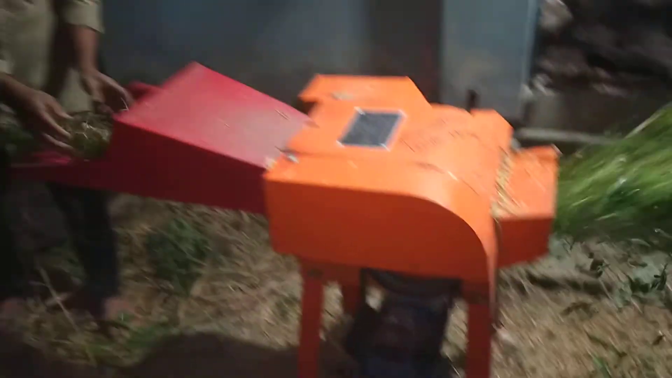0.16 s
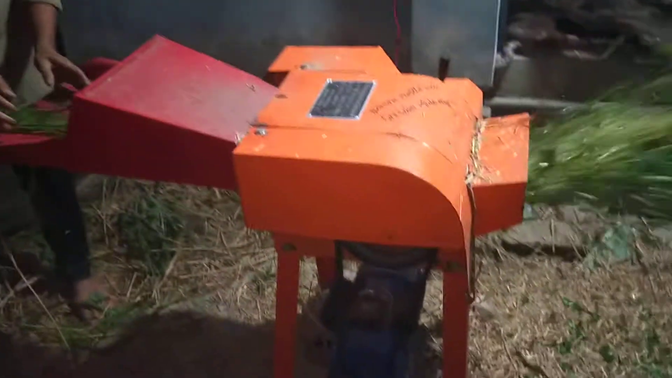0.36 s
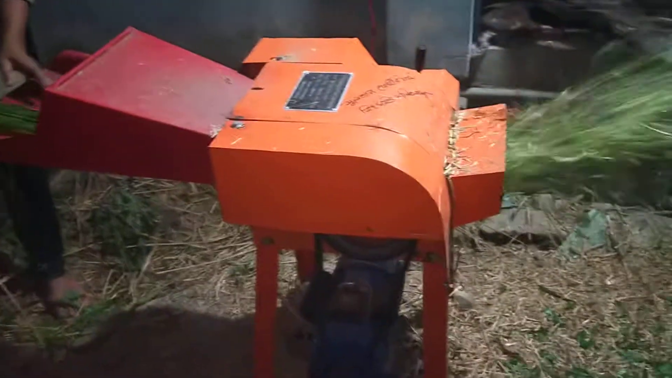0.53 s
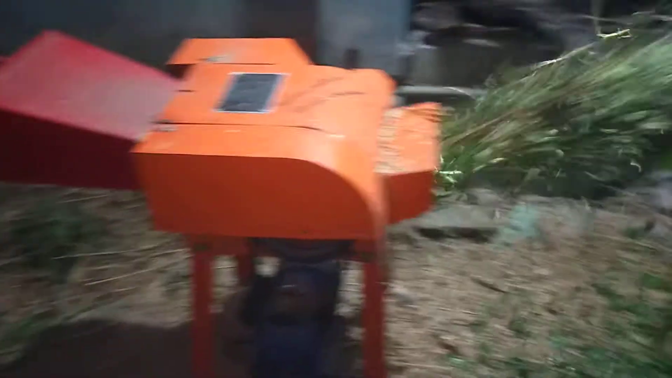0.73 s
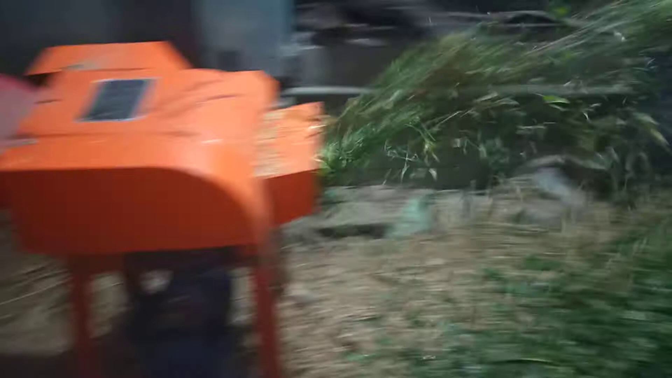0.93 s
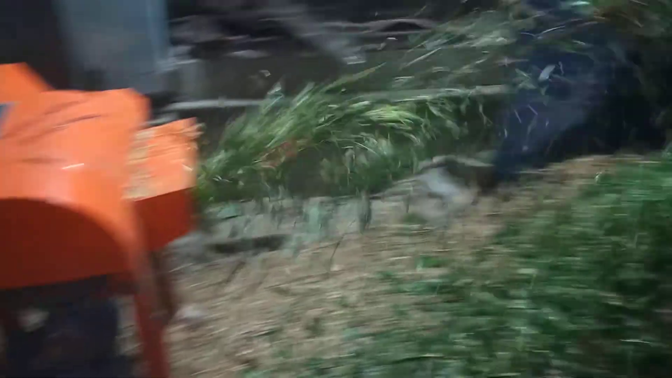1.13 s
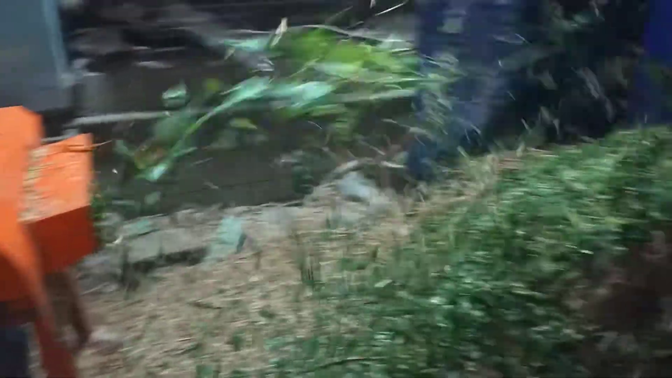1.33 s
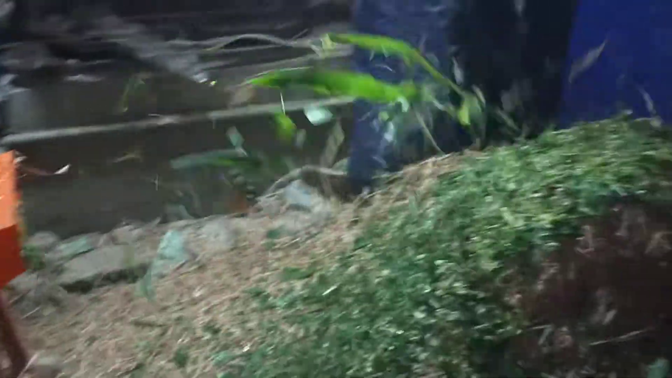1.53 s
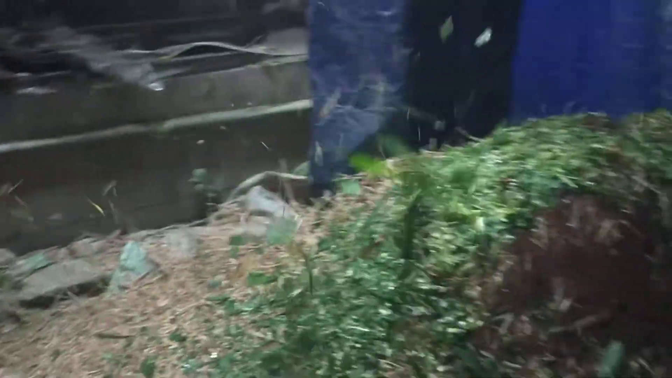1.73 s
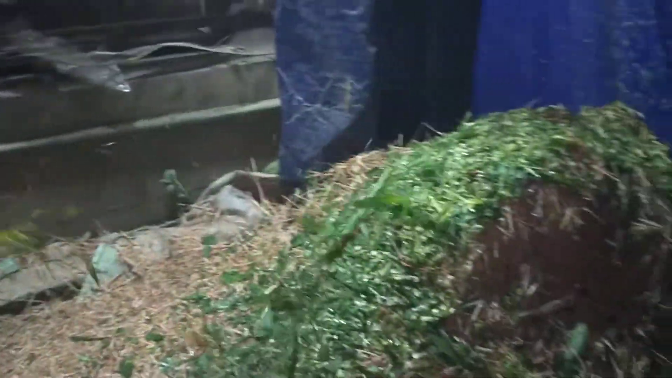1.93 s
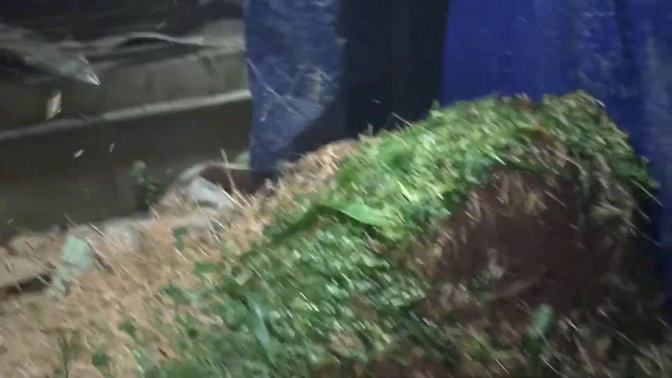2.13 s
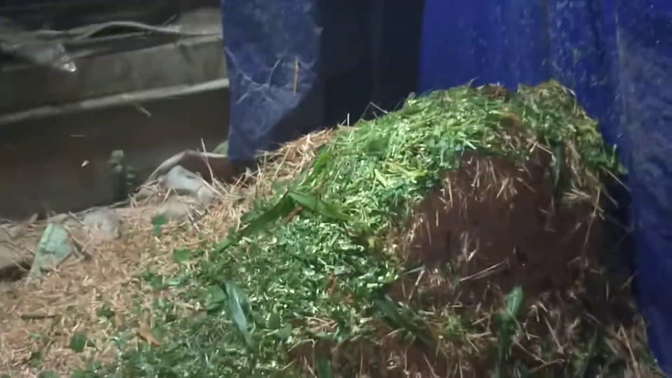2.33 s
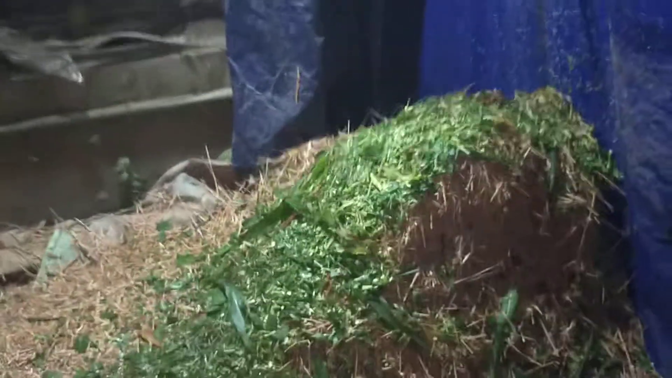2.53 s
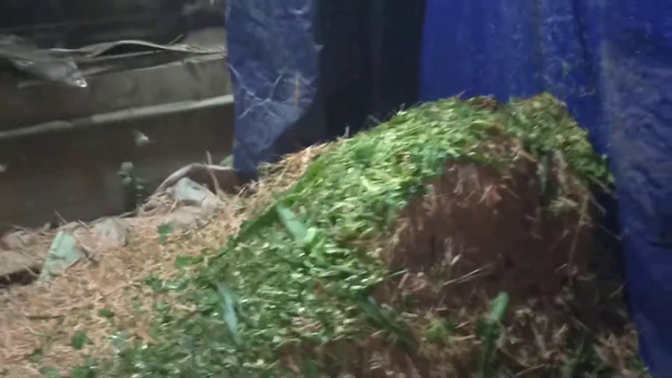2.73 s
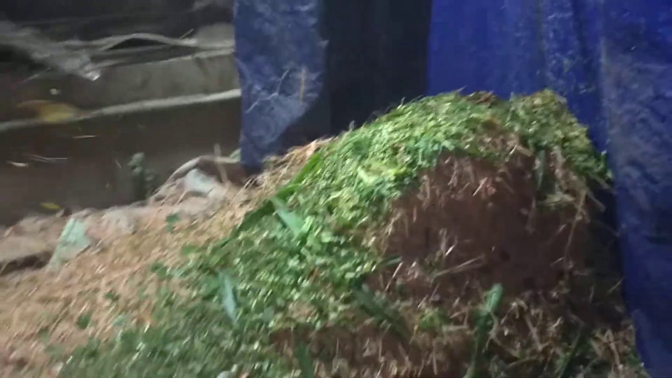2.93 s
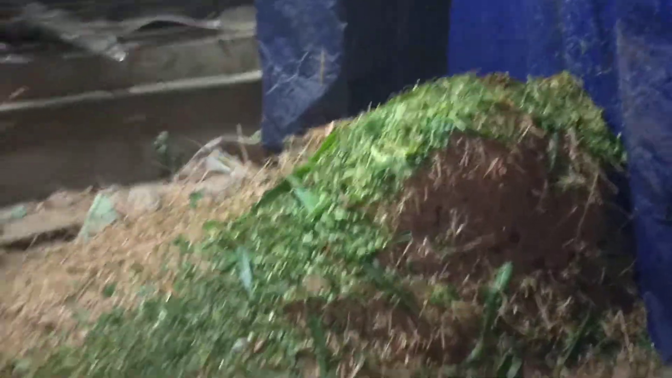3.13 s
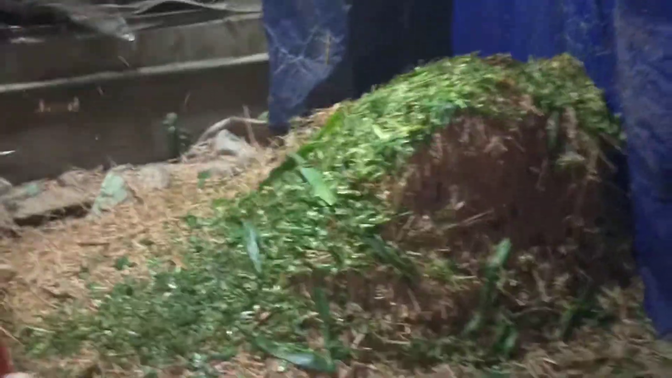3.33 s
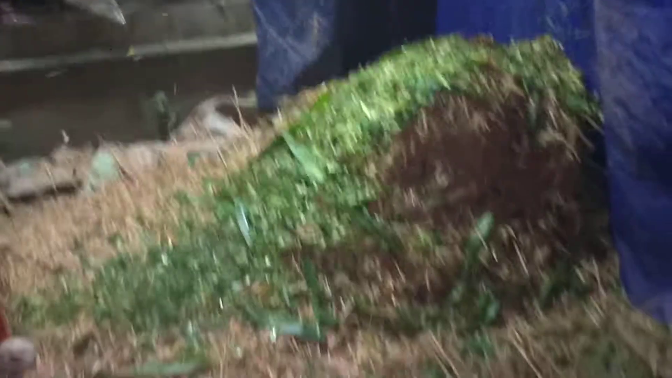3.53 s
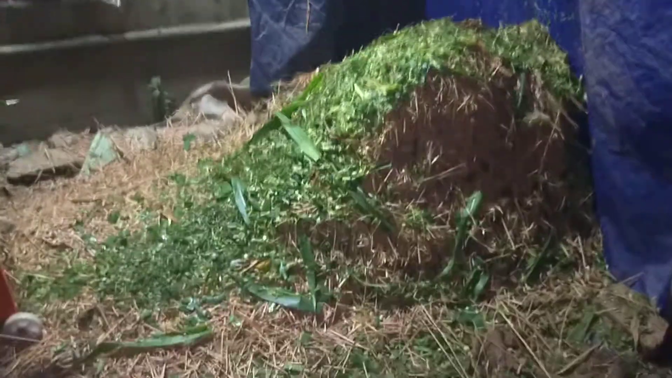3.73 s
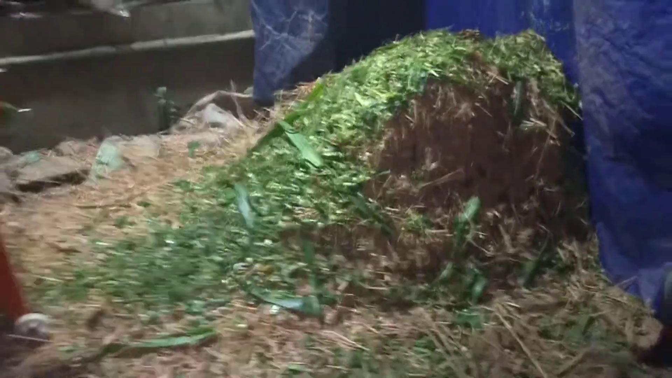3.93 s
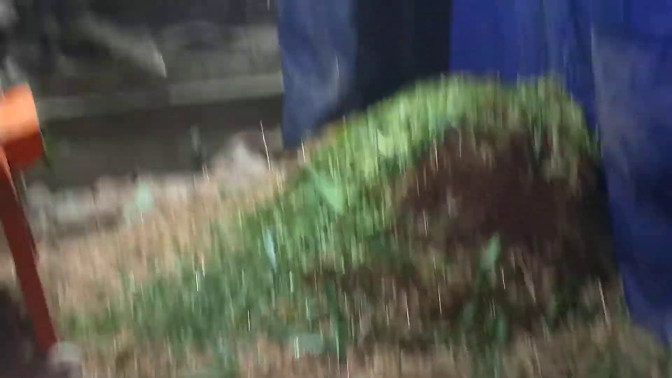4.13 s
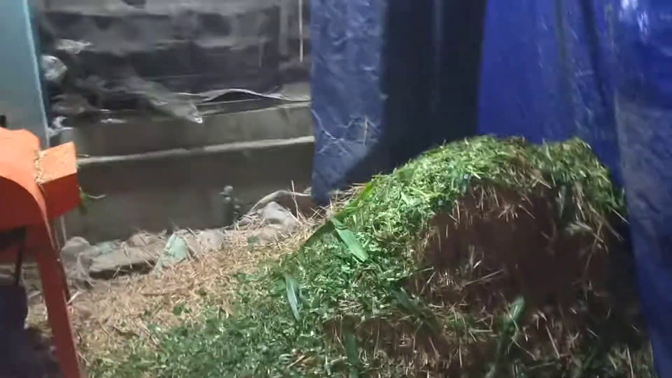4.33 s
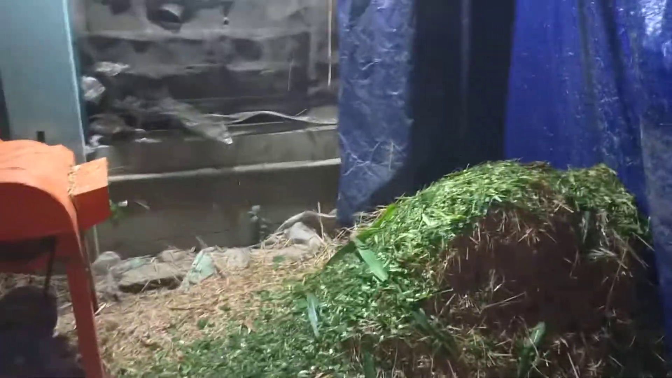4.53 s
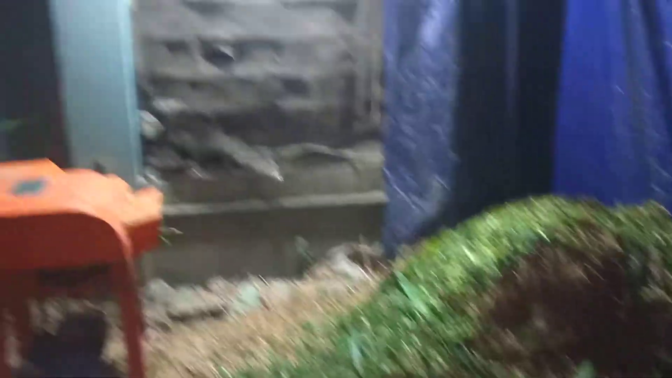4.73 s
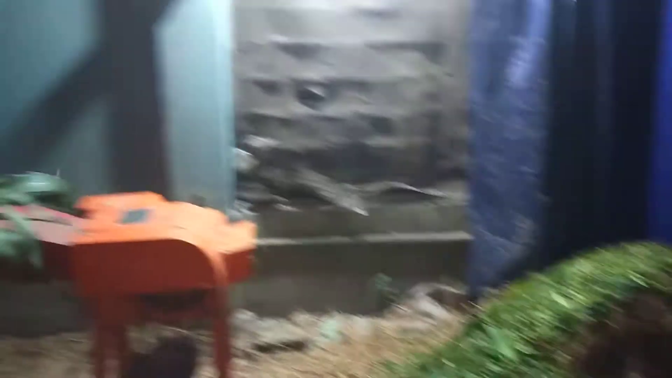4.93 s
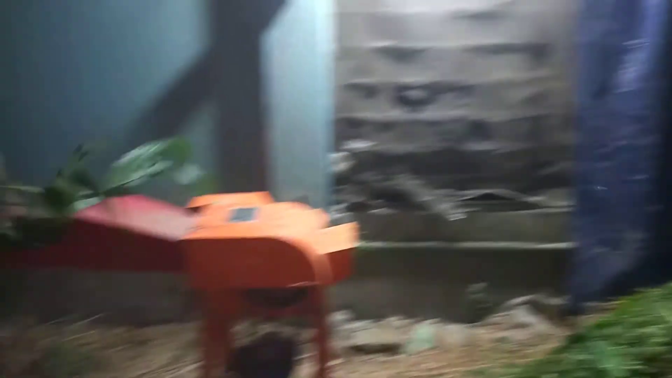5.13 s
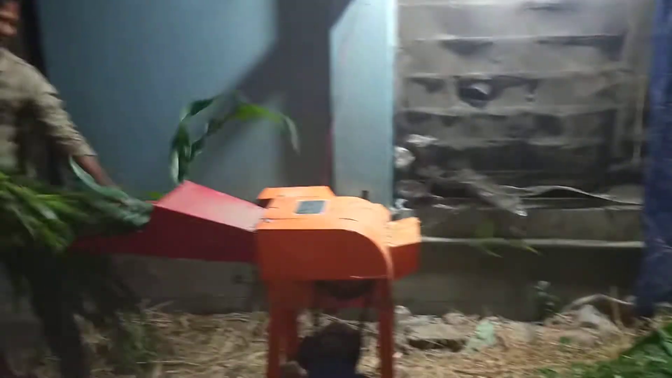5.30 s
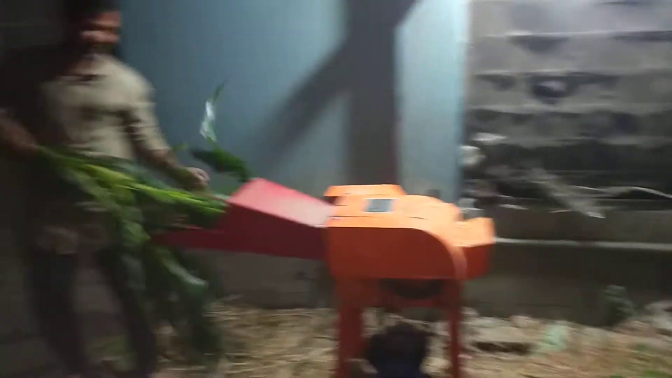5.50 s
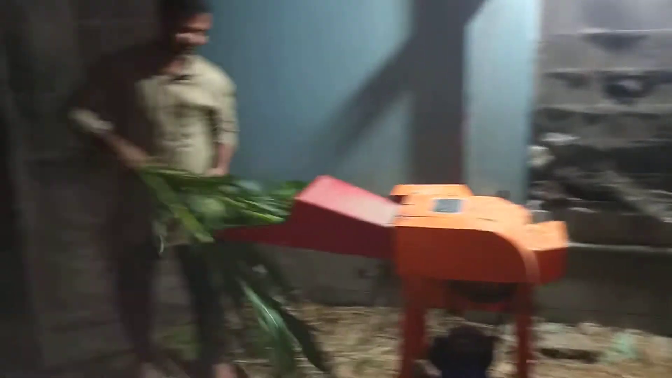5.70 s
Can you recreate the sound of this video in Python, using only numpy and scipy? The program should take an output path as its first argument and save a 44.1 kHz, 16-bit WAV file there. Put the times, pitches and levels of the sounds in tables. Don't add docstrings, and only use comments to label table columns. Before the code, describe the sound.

An electric chaff cutter runs in a farm shed, heard by a phone a few metres away. From 0 to about 0.8 s it is loud: some eighty blade blows a second fuse into a rough low buzz in the metal hood, with crunching, tearing stalks and a bright spray of chaff, swelling unevenly as thick wads pass. The pitch sags slightly until 0.7 s, then rises as the load eases. Sharp cracks and heavier knocks strike the cover between 0.5 and 1.25 s; a last faint wisp is chopped from 1.04 to 1.3 s. Then the level drops greatly. Until the end near 5.8 s the empty drum spins steadily with a hollow, airy rumble and faint wavering whir, while a loose sheet-metal cover taps and rattles around twenty times a second, unevenly, with occasional harder clatters and thin tinny flicks. A short, bright echo surrounds everything.

```python
import sys
import numpy as np
from scipy import signal
from scipy.fft import rfft, irfft
from scipy.io import wavfile
from scipy.ndimage import uniform_filter1d

SR = 44100
rng = np.random.default_rng(int(sys.argv[2]) if len(sys.argv) > 2 else 0)


def attenuation_scalar(level_db):
    decades = np.asarray(level_db, float) / 20
    return 10 ** decades


def store_pcm(level_fs):
    pcm = np.round(np.clip(level_fs, -1, 1) * 32767).astype(np.int16)
    wavfile.write(sys.argv[1], SR, np.atleast_2d(pcm).T)


N = 254016
TIME_S = np.arange(N) / SR

# frequency in Hz, level in dB per Hz.
HOLLOW_SPECTRUM = [(24, -98), (40, -52), (108, -22.5), (210, -7.5), (237, -5), (290, -2.5), (350, 1),
                   (395, -5), (428, -4.5), (545, -11.5), (591, -13), (806, -19.5), (1000, -22), (1300, -31),
                   (2200, -120)]
# frequency in Hz, level in dB per Hz.
PANEL_SPECTRUM = [(350, -34), (600, -1.5), (636, -13), (806, -6), (1150, -2.5), (1330, -7), (1500, -3.5),
                  (1920, -2.5), (2290, -1), (2490, -3.5), (2810, -5), (3160, -13.5), (4500, -27),
                  (5850, -39.5), (9900, -120)]
# frequency in Hz, level in dB per Hz.
HISS_SPECTRUM = [(2060, -47), (3500, 7), (4200, -2.5), (5110, -33), (5720, -15), (6280, -20.5), (6910, 0.5),
                 (7640, 2), (8340, 3), (9580, -13.5), (12000, -21), (13200, -10), (15100, -0.5),
                 (15800, -23)]
# frequency in Hz, width in Hz, level in dB.
SHEET_MODES = [(1160, 24, -18), (1635, 28, -3.5), (1950, 91, -4.5), (2224, 46, -1), (2470, 196, -15),
               (2686, 37, -4.5), (3368, 220, -14), (3500, 43, -29), (4190, 21, -17), (6600, 67, -20.5),
               (7180, 120, -19.5), (8260, 350, -19.5)]
COVER_RESTS = [2.45, 2.93, 3.26, 3.4, 4.03, 4.47, 4.98, 5.045, 5.6, 5.69]


def chopping(blade_passes):
    # multiple of the blade rate, level in dB.
    blow_harmonics = [(1, -46), (2, -26), (3, -7.5), (4, 0), (5, -14), (6, -9), (7, -12), (8, -11.5),
                      (9, -17), (10, -24), (11, -15), (12, -23), (13, -27)]
    # frequency in Hz, level in dB per Hz.
    stalk_spectrum = [(40, -70), (75, -42), (110, -28), (190, -15), (260, -4), (330, 0), (420, -5),
                      (520, -10), (700, -12), (1000, -13), (1400, -17), (2200, -15), (3200, -30),
                      (4500, -60)]
    # frequency in Hz, level in dB per Hz.
    spray_spectrum = [(1470, -21), (2500, -0.5), (2830, -4.5), (3880, -11.5), (5320, -15), (8380, -10),
                      (10800, -20.5), (13500, -21), (15200, -13), (15800, -16)]
    # time in seconds, change of level
    # in dB.
    stalk_wads = [(.035, 8.5), (.085, 4), (.235, 1), (.297, 2), (.39, 3.5), (.55, 1.5), (.597, 2),
                  (.625, 2), (.668, 5), (.7, 8), (.75, 3.5), (.79, -4), (.85, -1), (.94, 6.5), (1.004, 6)]
    blows_db, stalks_db, spray_db = feeding()

    passes = blade_passes + .45 + .005 * walk(40)
    hit = np.flatnonzero(np.diff(np.floor(passes)) > 0)
    blows = np.zeros(N)
    blows[hit] = attenuation_scalar(.8 * rng.standard_normal(len(hit)))
    harmonics = [(82.2 * k, db) for k, db in blow_harmonics]
    blows = hood(colour(blows, [(40, -58)] + harmonics + [(1400, -26.5), (2500, -51.5)]))

    gate = 5.1 + np.exp(-(passes % 1) / 2.9)
    tearing = rng.standard_normal(N) * gate * attenuation_scalar(walk(26.1))
    stalks = colour(tearing, stalk_spectrum) + attenuation_scalar(-17.5) * ring(tearing, SHEET_MODES[:6])
    spray = colour(grit(0.94) * (4 + gate) * attenuation_scalar(0.35 * walk(20.2)), spray_spectrum)

    wad_s = .016
    wads_db = sum(db * np.exp(-((TIME_S - s) / wad_s) ** 2) for s, db in stalk_wads)
    body = lift(attenuation_scalar(blows_db) * blows + attenuation_scalar(stalks_db) * stalks, 314, 150, wads_db)
    return body + attenuation_scalar(spray_db) * spray


def feeding():
    # time in seconds, load in dB, blade bite in dB.
    bundle = [
        (0, -19, -6),
        (.1, -19, 0.5),
        (.36, -20.5, -3.5),
        (.46, -21.5, -4.5),
        (.58, -19.5, -2),
        (.68, -20.5, -4),
        (.8, -23.5, -5.5),
        (.94, -33.5, -14),
        (1.06, -42.5, -15),
    ]
    load_db, bite_db = curves(bundle)
    clearing_db_s = 150
    load_db = load_db - clearing_db_s * np.maximum(TIME_S - bundle[-1][0], 0)

    wisp_start_s, wisp_rise_s, wisp_hold_s = 1.038, 0.034, 0.26
    wisp_db, wisp_fall_db_s = -38, 111
    falling_s = np.maximum(TIME_S - wisp_start_s - wisp_hold_s, 0)
    wisp = np.clip((TIME_S - wisp_start_s) / wisp_rise_s, 0, 1) * attenuation_scalar(wisp_db - wisp_fall_db_s * falling_s)

    total_db = 10 * np.log10(attenuation_scalar(load_db) ** 2 + wisp ** 2 + 1e-12)
    stalks_db = total_db - 5 - 0.35 * bite_db
    spray_db = -39 + 0.61 * (total_db + 22.0)
    return load_db + bite_db, stalks_db, spray_db


def hood(blows):
    upper = signal.lfilter(*signal.iirpeak(800, 1, SR), blows)
    turn = 2 * np.pi * np.fft.rfftfreq(N)
    smear = 1
    for lag in (97, 173):
        delay = np.exp(-1j * turn * lag)
        smear = smear * (delay - .6) / (1 - .6 * delay)
    blows = blows - upper + irfft(rfft(upper) * smear, N)
    for k in range(5, 13):
        blows = lift(blows, 80.5 * k, 50, 2 * np.tanh(walk(7)))
    return blows


def drone(blade_passes):
    start_db, sag_db_s, hold_db = -28, 23, -40
    end_s, stop_db_s = 0.62, 136
    db = np.maximum(start_db - sag_db_s * TIME_S, hold_db) - stop_db_s * np.maximum(TIME_S - end_s, 0)
    return np.sqrt(2) * attenuation_scalar(db + walk(20)) * np.sin(4 * np.pi * blade_passes)


def rattles():
    # time in seconds, peak level in dB.
    edge_flicks = [(1.3353, -51), (1.4305, -51), (1.4799, -53), (1.5797, -53), (1.6226, -51), (1.675, -57),
                   (1.7159, -55), (1.8336, -58), (1.9718, -54), (2.0297, -58), (2.0771, -54), (2.2088, -57),
                   (2.309, -53), (2.3724, -53), (2.4856, -58), (2.5525, -51), (2.7236, -55), (2.7515, -54),
                   (2.781, -43), (2.8274, -54), (2.8807, -52), (2.9735, -56), (3.0204, -47), (3.1182, -54),
                   (3.201, -53), (3.5507, -55), (3.6445, -56), (3.6994, -54), (3.7468, -46), (3.8336, -47),
                   (3.863, -48), (3.9318, -52), (3.9792, -45), (4.1184, -52.5), (4.1688, -48),
                   (4.2636, -54), (4.306, -58), (4.535, -54), (4.5943, -53), (4.6816, -52), (4.7355, -51),
                   (4.8597, -60), (4.9351, -50), (5.0817, -59), (5.3431, -54), (5.4105, -56), (5.4524, -53),
                   (5.5043, -64), (5.617, -55), (5.7233, -55)]
    flick_db, flick_ms, rise_share = 1, 15, 0.42
    flicks = [(s, db + flick_db - 30, 0, 0, 30, flick_ms) for s, db in edge_flicks]

    power = np.zeros((4, N + SR))
    age_ms = np.arange(SR // 5) / SR * 1000
    for s, db, *parts_db, ms in list(contacts()) + flicks:
        ms = max(ms, 3)
        rise = 1 - np.exp(-(age_ms / (rise_share * ms)) ** 2)
        shape = rise * (np.exp(-(age_ms / (1.35 * ms)) ** 4) + .4 * np.exp(-age_ms / 35))
        start = int((s - .007) * SR)
        peaks = attenuation_scalar(db + np.array([0, *parts_db]))[:, None]
        power[:, start:start + len(age_ms)] += (peaks * shape) ** 2
    flutter_db = 1.6 * walk(170) + [1.1 * walk(70) for _ in power]
    treble, panel, bracket, edge = np.sqrt(power[:, :N]) * attenuation_scalar(flutter_db)

    out = chatter(-15.0, grit(0.87), treble, band(HISS_SPECTRUM, 6200, 9600))
    out += chatter(-17, grit(0.87), bracket, band(HISS_SPECTRUM, 5000, 6200))
    out += chatter(-9, rng.standard_normal(N), panel, band(HOLLOW_SPECTRUM, 236, 570))
    out += chatter(-10.5, grit(1.1), edge, band(HISS_SPECTRUM, 12600, 16000))
    out += chatter(-18.5, grit(1.1), edge, band(HISS_SPECTRUM, 9500, 13300))
    out += chatter(-4.0, grit(0.97), bracket, [(2600, -24), (3200, -2.0), (4400, -9.0), (5200, -25.5)])
    out += chatter(-7.5, grit(1.9), panel, band(PANEL_SPECTRUM, 600, 3170))

    catch_faces_s, catch_span_s = 5.2, 0.39
    facing_db = -10 * ((TIME_S - catch_faces_s) / catch_span_s) ** 2
    catch = ring(grit(3.1) * bracket, [(3960, 110, 0), (3340, 50, -3)])
    out += attenuation_scalar(-4 + facing_db) * catch * np.std(bracket)

    for part, lo_hz, hi_hz, db in (panel, 0, 3000, -8), (bracket, 3000, 5000, -12), (treble, 5000, SR, -12):
        modes = [mode for mode in SHEET_MODES if lo_hz < mode[0] < hi_hz]
        out += attenuation_scalar(db) * ring(grit(3.7) * part, modes) * np.std(part)
    return out


def chatter(db, noise, envelope, spectrum):
    return attenuation_scalar(db) * colour(noise * envelope, spectrum) * np.std(envelope)


def contacts():
    # time in seconds, treble peak in dB, panel minus treble in dB, length in ms.
    stalk_knocks = [
        (.5108, -40, -7, 12),
        (.588, -29.5, 2, 4.5),
        (0.729, -30.5, 3, 8.1),
        (0.78, -32.5, 9.5, 12),
        (0.87, -36.5, 9.5, 12.4),
        (.918, -39, 9, 19),
        (1.0226, -45, 12, 14),
        (1.1084, -41.5, 9, 21),
        (1.185, -33, 4, 27),
        (1.251, -37.5, 7.5, 21),
    ]
    # time in seconds, treble peak in dB, panel minus treble in dB, length in ms.
    hard_rattles = [(1.44, -36, 1.5, 11), (1.514, -43, 8, 15), (1.549, -40.5, 6, 19), (1.623, -42, 1.5, 14),
                    (3.4382, -45.5, 8.5, 26), (2.123, -46.5, 11, 12), (2.2126, -39, 10, 16.3),
                    (5.3962, -51, 13.5, 23), (2.485, -43.5, 8, 27), (5.074, -44, 7, 14),
                    (2.683, -39.5, 6, 19), (2.7245, -41.5, 8.5, 16), (2.7457, -40, 5, 13),
                    (2.777, -40.5, 6.5, 18), (2.837, -40.5, 5, 19), (3.084, -41, 6, 11),
                    (3.115, -43.5, 9, 18), (3.2007, -45.5, 12.5, 17), (4.534, -43, 7.5, 32),
                    (3.7, -42.5, 10.5, 34), (3.744, -38, 5, 16.5), (3.8343, -45, 7, 16),
                    (4.682, -45.5, 8, 16), (4.074, -41.5, 4.5, 19), (4.1247, -40.5, 5.5, 13),
                    (4.166, -44.5, 11, 18), (4.6, -40.5, 5, 16), (4.935, -40, 2, 23), (5.176, -41, 2, 15),
                    (5.725, -42.5, 4, 19)]
    # time in seconds, bracket peak in dB, treble minus bracket in dB.
    light_ticks = [(1.341, -41, -9), (1.583, -45.5, -5.5), (1.8362, -51, -5), (1.863, -51, -1.5),
                   (1.929, -43, -4), (2.0497, -47.5, -3.5), (2.0794, -51, -5), (2.2508, -48, -6),
                   (2.305, -47, -2), (2.345, -43, -6.5), (2.4074, -47.5, -5), (2.5494, -42, -4.5),
                   (2.5895, -44.5, -7), (2.6194, -44, -5), (2.868, -37, -12.5), (2.9714, -41.5, -8),
                   (3.308, -42.5, -7.5), (3.516, -44, -11), (3.6, -45.5, -10), (3.643, -41.5, -10),
                   (3.7898, -46, -8), (3.93, -40, -13), (3.9804, -44.5, -8), (4.2153, -46, -6),
                   (4.2692, -49, -10), (4.3061, -45, -10), (4.3485, -48, -9), (4.4094, -53, -8),
                   (4.7341, -41, -16), (4.7644, -49, -15), (4.7975, -43, -9), (4.8594, -44, -8.5),
                   (4.959, -43, -7), (5.1094, -50, -9), (5.149, -51.5, -3), (5.2185, -53, -7),
                   (5.2729, -44, -22), (5.452, -40.5, -14.5), (5.5019, -46, -11), (5.5807, -46.5, -14),
                   (5.6475, -50.5, -6.5)]
    tick_db, tick_bracket_db, tick_ms = 6.5, -16.5, 16
    tap_db, tap_panel_db, tap_ms, tap_growth_db_s = -51, 9, 9.9, 1.3
    shaft_hz, lift_phase, lift_jitter_s, clear_s = 20.975, .42, .006, .026

    light = [(s, db + rel_db + tick_db, tap_panel_db, tick_ms) for s, db, rel_db in light_ticks]
    hard = np.array(light + stalk_knocks + hard_rattles)

    turn = np.arange(27, 121)
    timing, balance, length = np.clip(rng.standard_normal((3, len(turn))), -1.6, 1.6)
    s = (turn + lift_phase) / shaft_hz + lift_jitter_s * timing
    taps = np.transpose([s, tap_db + tap_growth_db_s * (s - 1),
                         tap_panel_db + 1.3 * balance, tap_ms * (1 + 0.33 * length)])
    taken_s = np.append(hard[:, 0], COVER_RESTS)
    free = np.abs(s[:, None] - taken_s).min(axis=1) > clear_s
    rows = np.vstack([hard, taps[free]])

    scatter = np.tanh(rng.standard_normal((len(rows), 2))) * 1.6
    parts_db = [-11, -16] + scatter * [5.5, 3] - 0.11 * (rows[:, 1:2] - tap_db)
    parts_db[:len(light_ticks), 0] = tick_bracket_db - np.array(light_ticks)[:, 2]
    return np.hstack([rows[:, :3], parts_db, rows[:, 3:]])


def drum(blade_passes):
    # time in seconds, frame shake in dB, facing from outlet (0) to hood (1).
    swing = [(.9, -34, 0.14), (1.16, -40.5, 0.29), (1.2, -32, 0.081), (1.36, -37, 0.18), (1.87, -39, 0.29),
             (2.4, -36.5, 0.57), (2.56, -35.5, 0.26), (2.72, -36, 0.24), (3.32, -40, 0.64),
             (3.63, -38.5, 0.49), (3.78, -35, 0.84), (3.84, -40, 0.52), (4.2, -38.5, 0.34),
             (4.53, -40.5, 1), (4.84, -40.5, 1), (4.97, -37.5, 0.57), (5.34, -41.5, 0.33),
             (5.76, -39, 0.12)]
    # multiple of shaft rate, level in dB, clearest moment in seconds, fade in dB per second either side.
    whir = [
        (8, -66, 1, 1.5),
        (12, -56, 2.6, 3),
        (14, -51, 2, 2),
        (16, -54, 1, 1.5),
        (20, -53, 1, 1),
        (28, -56.5, 1, 4.5),
        (32, -55, 2.1, 5),
    ]
    shake_db, facing = curves(swing)

    air = colour(rng.standard_normal(N) * attenuation_scalar(.6 * walk(12)), HOLLOW_SPECTRUM)
    air = lift(air, 348, 5.3, 5 - 4 * facing)
    boomy = lift(air, 190, 97, 2 - 5 * facing)
    rumble = lift(boomy, 426, 99, -6 + 10.5 * facing)

    tones = np.zeros(N)
    for k, db, clearest_s, fade_db_s in whir:
        tone_db = db + 40 + 6 - 7 * facing - fade_db_s * np.abs(TIME_S - clearest_s) + 3.8 * walk(9)
        shaft_turns = k * blade_passes / 4
        tones += attenuation_scalar(tone_db) * np.sin(2 * np.pi * (shaft_turns + .18 * walk(13)))

    buzz = grit(0.63) * attenuation_scalar(2.1 * walk(29.78))
    panel = colour(buzz, PANEL_SPECTRUM) + attenuation_scalar(-6.5) * ring(buzz, SHEET_MODES[:9])
    hiss = colour(grit(2.9), HISS_SPECTRUM) * attenuation_scalar(3.5 * walk(4.58))
    panel_db = -46 + 0.74 * (shake_db + 40)
    hiss_db = -61.5 + .25 * (shake_db + 42.5)
    metal = attenuation_scalar(panel_db) * panel + attenuation_scalar(hiss_db) * hiss
    return attenuation_scalar(shake_db - 1.54) * (rumble + tones) + hush() * metal


def hush():
    rest_db, rest_s = -2.5, 0.019
    return attenuation_scalar(rest_db * sum(np.exp(-((TIME_S - s) / rest_s) ** 2) for s in COVER_RESTS))


def shed(cutter):
    t60_s, echo_db = .3, -13.5
    age_s = np.arange(SR // 2) / SR
    tail = rng.standard_normal(len(age_s)) * np.exp(-np.log(1000) * age_s / t60_s) * (age_s > .006)
    tail = signal.lfilter(*signal.butter(2, 1100, "high", fs=SR), tail)
    tail = tail / np.sqrt(np.sum(tail ** 2))
    n = len(age_s)
    running = np.concatenate([cutter[n:0:-1], cutter])
    return attenuation_scalar(echo_db) * signal.fftconvolve(running, tail)[n:n + N]


def level(x, db):
    return x * attenuation_scalar(db) / np.sqrt(np.mean(x ** 2))


def curves(table):
    s, *columns = np.transpose(table)
    return [np.interp(TIME_S, s, column) for column in columns]


def colour(x, points):
    hz, db = np.transpose(points)
    grid = np.maximum(np.fft.rfftfreq(8192, 1 / SR), 1)
    grid_db = np.interp(np.log(grid), np.log(hz), np.maximum(db, -90))
    cep = irfft(grid_db * np.log(10) / 20)
    cep[1:4096] *= 2
    cep[4097:] = 0
    response = irfft(np.exp(rfft(cep)))
    return level(irfft(rfft(x) * rfft(response, N), N), 0)


def ring(x, modes):
    out = np.zeros(N)
    for hz, width, db in modes:
        turn_db = 5 * np.tanh(walk(22))
        out += signal.lfilter(*signal.iirpeak(hz, hz / width, SR), x * attenuation_scalar(db + turn_db))
    return level(out, 0)


def lift(x, hz, width, db):
    return x + (attenuation_scalar(db) - 1) * signal.lfilter(*signal.iirpeak(hz, hz / width, SR), x)


def band(points, lo_hz, hi_hz):
    inside = [p for p in points if lo_hz <= p[0] <= hi_hz]
    return [(.8 * lo_hz, -60)] + inside + [(1.2 * hi_hz, -60)]


def walk(rate):
    k = int(SR / rate)
    held = np.repeat(rng.standard_normal(2000), k)[:N]
    return 1.3 * uniform_filter1d(uniform_filter1d(held, k), k)


def grit(spread_db):
    return rng.standard_normal(N) * attenuation_scalar(spread_db * rng.exponential(size=N))


def scene():
    # time in seconds, blade rate in Hz.
    drum_speed = [
        (0, 81),
        (.25, 80.6),
        (.5, 80.1),
        (.72, 79.6),
        (.84, 81.3),
        (.95, 82.8),
        (1.2, 83.7),
        (2, 83.9),
        (5.76, 83.9),
    ]
    blade_passes = np.cumsum(curves(drum_speed)[0]) / SR
    cutter = chopping(blade_passes) + drum(blade_passes) + rattles()
    return (cutter + shed(cutter) + drone(blade_passes))[None]


def roll_off(x):
    return signal.sosfilt(signal.butter(12, 16880, fs=SR, output="sos"), x)


def record(dry):
    bass_hz, top_hz, seam_hz = 62, 15740, 7900
    push_db, push_s, ceiling = -22, .0015, .5
    heard = signal.sosfilt(signal.butter(2, bass_hz, "high", fs=SR, output="sos"), dry)
    heard = heard + attenuation_scalar(push_db) * np.exp(-TIME_S / push_s)
    heard = ceiling * np.tanh(heard / ceiling)
    heard = signal.sosfilt(signal.ellip(12, .3, 60, top_hz, fs=SR, output="sos"), heard)
    heard = signal.lfilter(*signal.iirnotch(seam_hz, 60, SR), heard)
    return roll_off(heard)


dry = scene()
out = record(dry)
store_pcm(out)
```